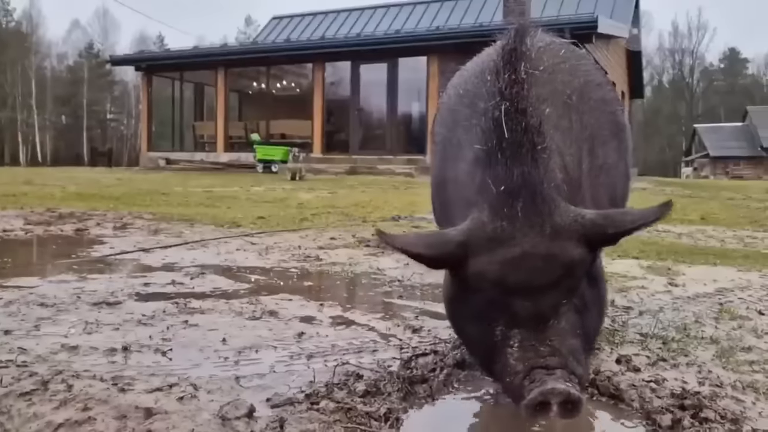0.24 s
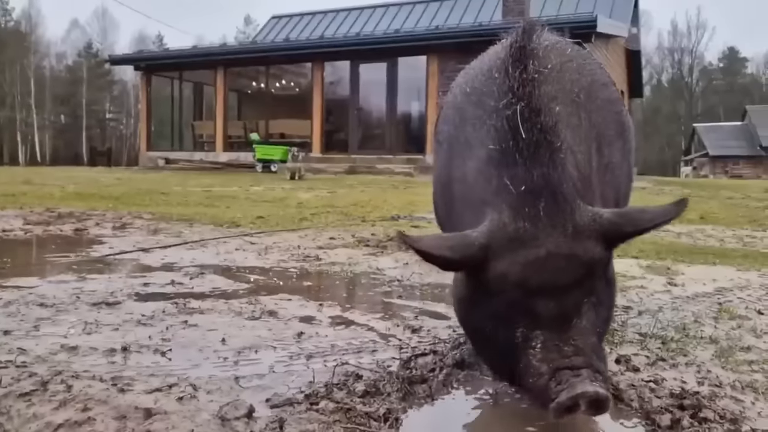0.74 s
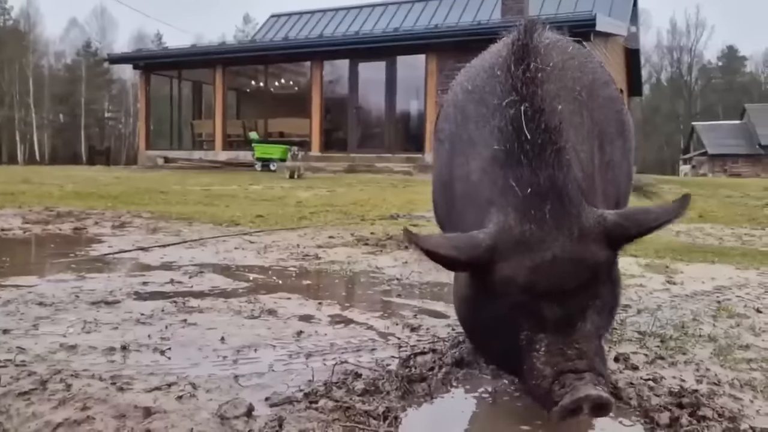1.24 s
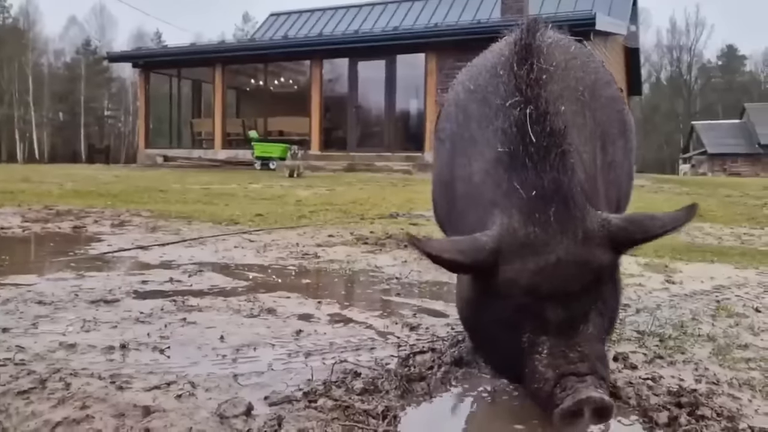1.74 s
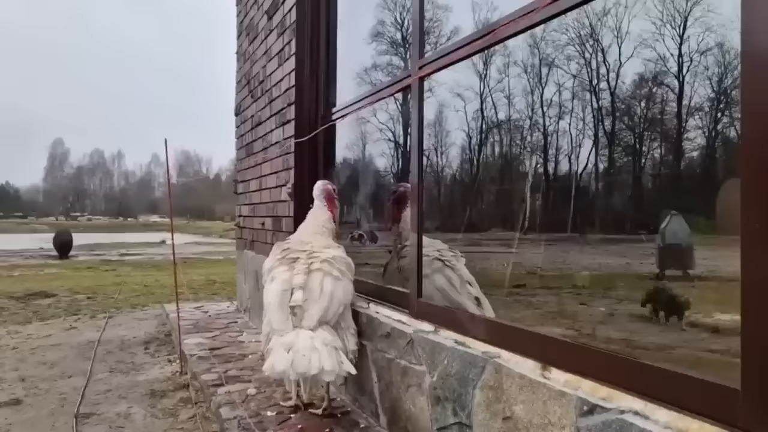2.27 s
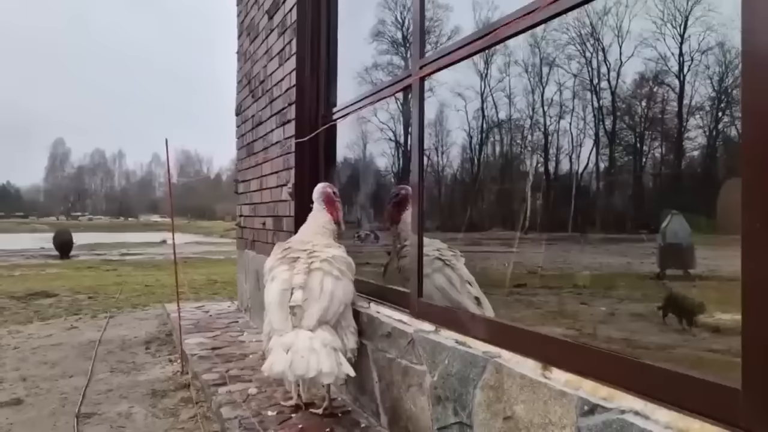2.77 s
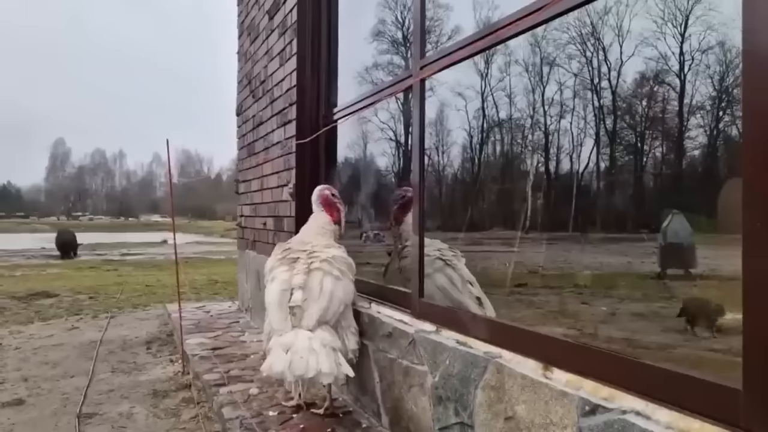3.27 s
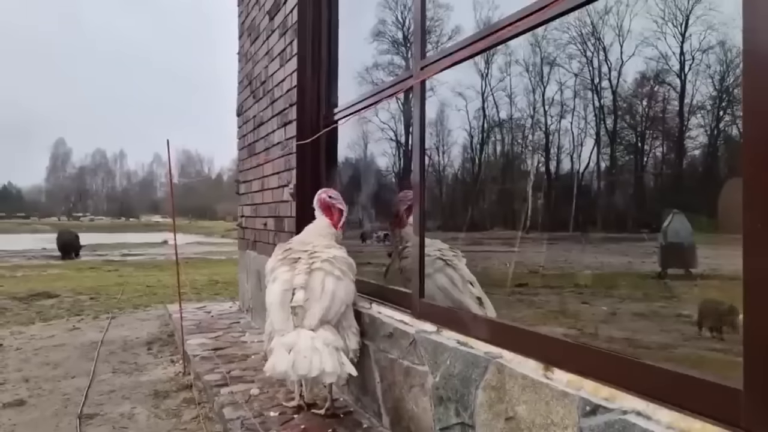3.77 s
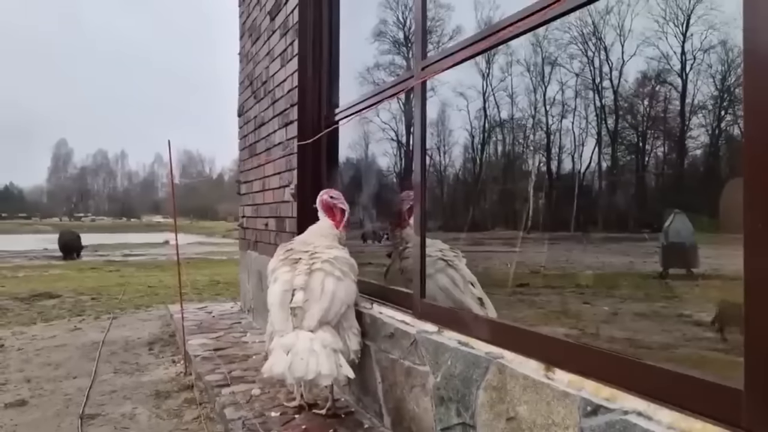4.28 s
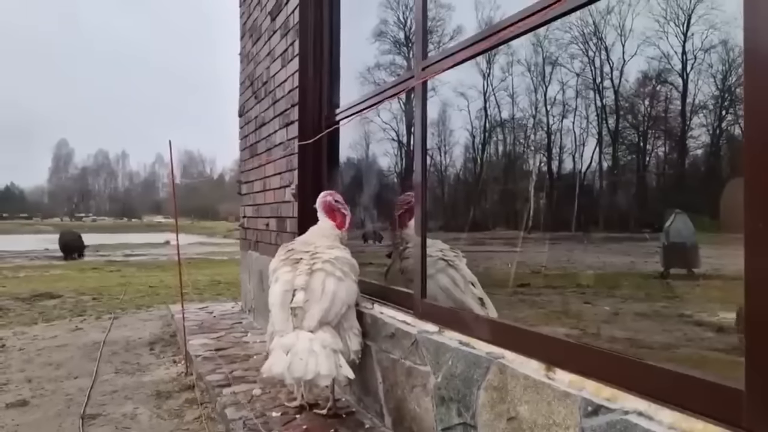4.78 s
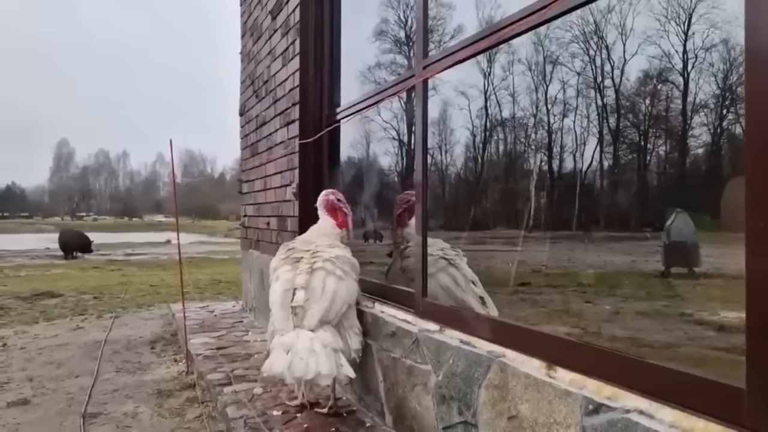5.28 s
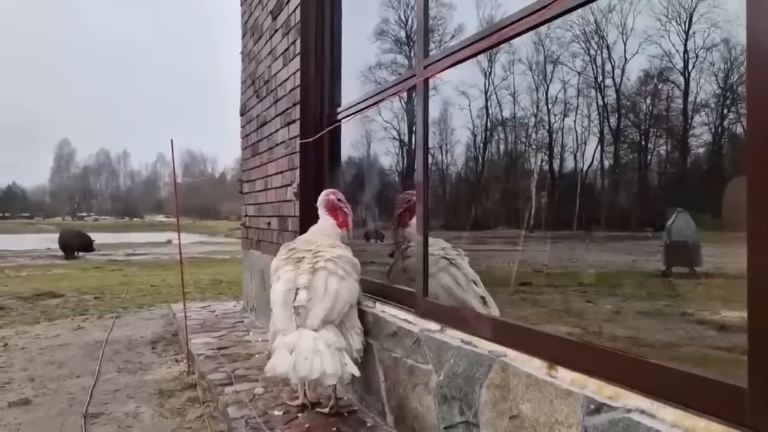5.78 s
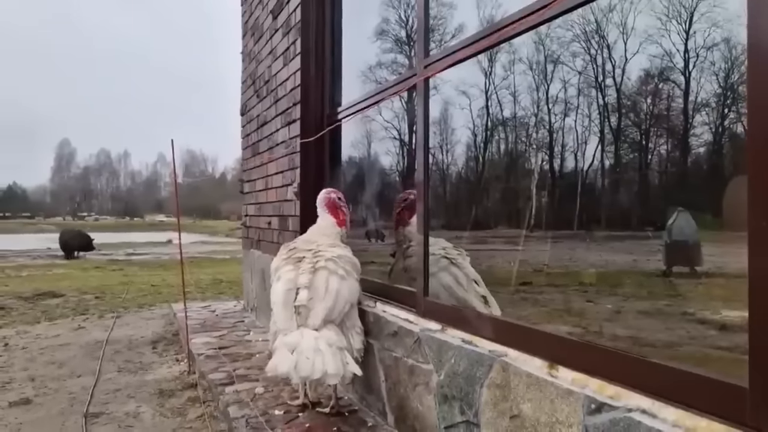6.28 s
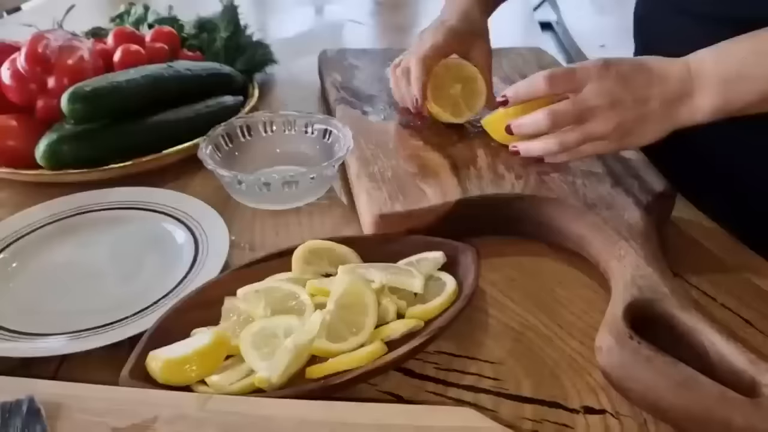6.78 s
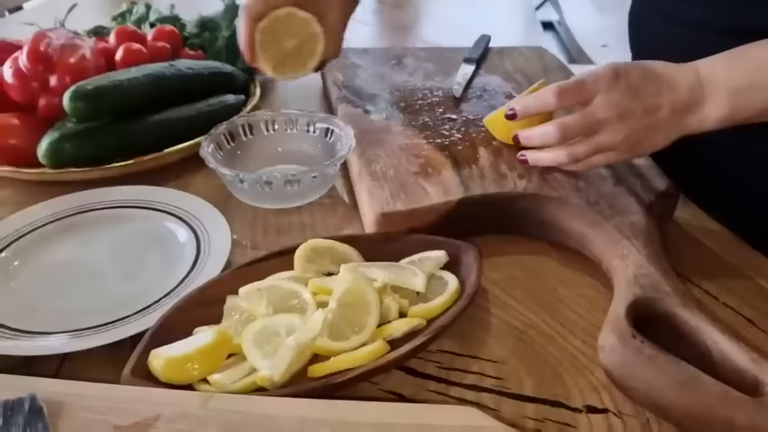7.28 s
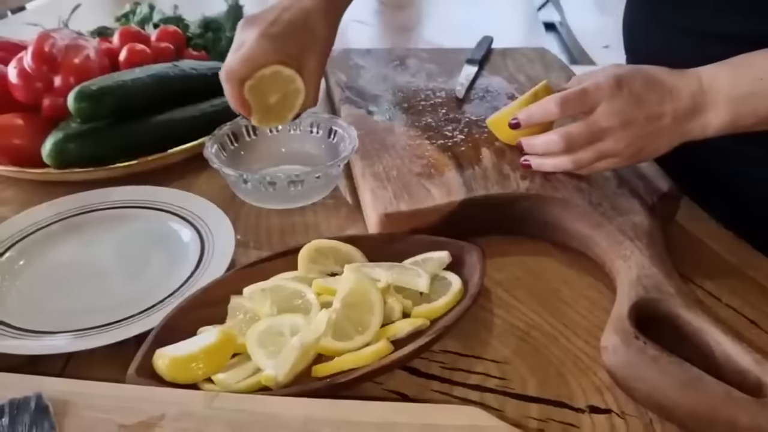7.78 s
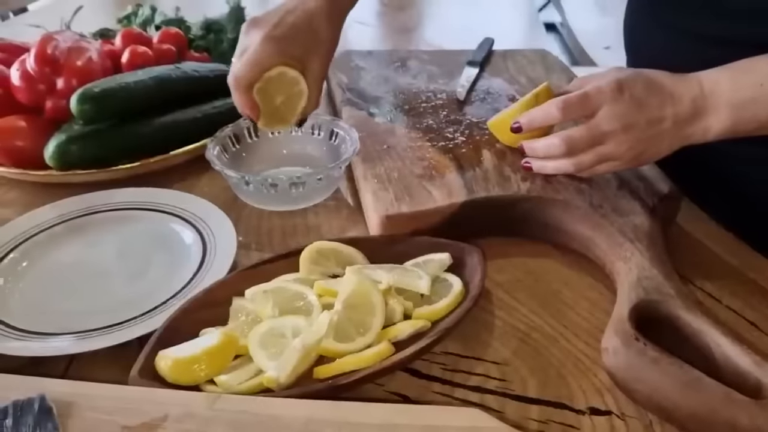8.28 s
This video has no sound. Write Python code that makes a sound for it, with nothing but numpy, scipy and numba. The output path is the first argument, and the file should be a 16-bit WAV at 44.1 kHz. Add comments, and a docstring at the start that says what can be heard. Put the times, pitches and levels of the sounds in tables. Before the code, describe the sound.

A pig roots and slurps wetly in mud, then a turkey peeps and yelps in a quiet yard, then a low kitchen hum.

```python
"""Pig, turkey and kitchen

Three moments joined by hard cuts. A pig roots, slurps and snorts in wet mud, made of bubble tones and noise.
A turkey by a window yelps with near-sine calls, peeps, clucks, ticks and drums softly in a quiet yard.
Air and low wind, both shaped noise, run under these two. Then a kitchen hums as noise in its room modes
while a clatter dies away, a hiss grows and squeezed fruit gives faint wet ticks."""
import sys
import numpy as np
from scipy import signal
from scipy.io import wavfile
from scipy.ndimage import uniform_filter1d
from numba import njit

SR = 44100
rng = np.random.default_rng(int(sys.argv[2]) if len(sys.argv) > 2 else 0)


def store_pcm(level_fs):
    """Save levels as 16-bit WAV."""
    pcm = np.round(np.clip(level_fs, -1, 1) * 32767).astype(np.int16)
    wavfile.write(sys.argv[1], SR, np.atleast_2d(pcm).T)


N = 376173  # length in samples
T = np.arange(N) / SR  # time of each sample in seconds
YARD_S, KITCHEN_S = 2.227, 6.8  # when the yard and the kitchen begin, in seconds


def undb(db):
    """Turn a level in dB into a multiplier."""
    return 10 ** (np.asarray(db) / 20)


def unit(x):
    """Scale a sound to an average (rms) level of 1."""
    return x / np.sqrt(np.mean(x ** 2))


@njit
def svf(x, hz, width):
    """Resonance that lets through sound around one pitch (a state-variable band-pass), gain 1 at its centre."""
    y, band_state, low_state = np.empty(len(x)), 0., 0.
    g, k = np.tan(np.pi * hz / SR), width / hz
    for i in range(len(x)):
        v = (band_state + g * (x[i] - low_state)) / (1 + g * (g + k))
        band_state = 2 * v - band_state
        low_state = low_state + 2 * g * v
        y[i] = k * v
    return y


def band(hz, width, size=N):
    """Noise through one resonance twice, at rms level 1."""
    noise = rng.standard_normal(size)
    once = svf(noise, 1. * hz, 1. * width)
    return unit(svf(once, 1. * hz, 1. * width))


def walk(rate):
    """Smooth random wandering, with about `rate` new levels a second and rms 1."""
    hold = int(SR / rate)
    steps = np.repeat(rng.standard_normal(N // hold + 1), hold)
    smooth = uniform_filter1d(uniform_filter1d(steps, hold), hold)
    return unit(smooth[:N])


def curves(table, off_db=-120):
    """Draw each column of a table as a curve over time, silent outside the times it lists."""
    s, *columns = np.transpose(table)
    return [np.interp(T, s, c, left=off_db, right=off_db) for c in columns]


def add(out, s, sound):
    """Mix a short sound in at time s."""
    i = max(int(s * SR), 0)
    out[i:i + len(sound)] += sound[:N - i]


def pops(table, rise_ms, glide, wet, spread):
    """Each pop is a bubble tone, gliding up if the bubble shrinks, mixed with noisy spatter around its pitch."""
    out, wet = np.zeros(N), np.clip(wet, 0, 1)
    for s, db, hz, ms, rise, wide in zip(*np.broadcast_arrays(*np.transpose(table), rise_ms, spread)):
        t = T[:int(7 * (ms + rise) * SR / 1000)]
        shape = (1 - np.exp(-1000 * t / rise)) ** 2 * np.exp(-1000 * t / ms)
        tone = np.sin(2 * np.pi * hz * t * (1 + glide * (1000 * t / ms).clip(0, 3)))
        spatter = band(hz, wide * hz, size=len(t)) / np.sqrt(2)
        mixture = np.sqrt(1 - wet) * tone + np.sqrt(wet) * spatter
        add(out, s - rise / 1000, undb(db) * shape / shape.max() * mixture)
    return out


def swell(out_size, hz, width, clear):
    """A rounded burst: a tone and breath in one resonance, more tone as clear nears 1."""
    tone = np.sin(2 * np.pi * hz * T[:out_size])
    breath = band(hz, width, size=out_size) / np.sqrt(2)
    return np.hanning(out_size) ** 0.35 * (clear * tone + (1 - clear) * breath)


def air():
    """Outdoor air and microphone hiss: many bands of noise, each flickering a little in level."""
    # Each row: pitch in Hz, relative level in dB per Hz.
    air_colour = [(15, -36), (25, -6), (55, 0), (82, 0), (160, -23.5), (227, -12.5), (378, -16), (762, -21),
                  (1240, -26.5), (4750, -28.5), (7100, -32.5), (14300, -34.5), (15500, -34.5)]
    hz, db = np.transpose(air_colour)
    out = 0
    for f in 200 * 2 ** np.arange(0, 6.4, 1 / 3):
        band_db = np.interp(np.log(f), np.log(hz), db) + 1.26 * walk(3.08)
        # a wider band holds more power, hence the square root
        out = out + undb(band_db) * np.sqrt(f) * band(f, f / 2.0)
    return undb(-52.5) * unit(out)


def wind():
    """Low buffeting on the microphone: deep noise bands that swell in short irregular lumps."""
    # How strong the low wind is. Each row: time in seconds, relative level in dB.
    wind_levels = [(0.0, -43.5), (1.81, -45), (3.59, -50.5), (5.73, -49), (6.18, -51), (6.79, -49.5)]
    lumps = band(58.2, 35) + undb(-3.5) * band(93, 60) + undb(-9) * band(169, 134)
    return undb(curves(wind_levels)[0] + 3.5 + 0.86 * walk(14)) * unit(lumps)


def bursts(low_hz, top_hz, wet):
    """Pops whose pitch lies in a range; higher ones rise faster and spatter over a relatively narrower band."""
    # Air pockets and water films bursting at the snout and lips.
    # Each row: time in seconds, peak level in dB, pitch in Hz, decay in milliseconds.
    burst_table = [(0.0288, -22.5, 540, 6.6), (0.0503, -14.5, 363, 3.5), (0.0547, -17.5, 2410, 5.0),
                   (0.0558, -18, 5040, 4.4), (0.071, -19.5, 550, 4.6), (0.0713, -13.5, 1740, 2.8),
                   (0.0888, -16.5, 566, 6.2), (0.096, -17, 1800, 4.6), (0.1426, -21, 3500, 3.6),
                   (0.1823, -18.5, 6800, 2.1), (0.1908, -2.5, 1130, 2.4), (0.1912, -17.5, 5000, 1.4),
                   (0.2083, -12.5, 1800, 2.3), (0.24, -34, 1920, 2.2), (0.262, -24, 2830, 1.5),
                   (0.3003, -24, 503, 3.2), (0.3085, -26.5, 494, 19), (0.31, -22, 4960, 3.2),
                   (0.3407, -13.5, 413, 3.4), (0.34, -23, 3770, 2), (0.373, -21.5, 487, 7.3),
                   (0.3752, -22.5, 3500, 1.7), (0.4259, -21.5, 576, 5.9), (0.4263, -26, 1800, 2.3),
                   (0.4262, -23, 7000, 2.6), (0.439, -21, 1720, 2.4), (0.4644, -16, 1225, 4.4),
                   (0.4665, -21, 1790, 11), (0.4772, -13, 3187, 1.6), (0.489, -20.5, 350, 3.2),
                   (0.4898, -18.5, 1810, 4.4), (0.503, -34.5, 8900, 1.3), (0.549, -15, 2060, 2.2),
                   (0.5496, -10, 4790, 2.9), (0.5534, -9, 925, 7.1), (0.5554, -18.5, 3210, 3.4),
                   (0.57, -23, 2100, 1.3), (0.6068, -22, 7800, 1.6), (0.6503, -15, 351, 10),
                   (0.6504, -21, 2660, 4.2), (0.6567, -19.5, 1980, 6.5), (0.6702, -14.5, 356, 3.7),
                   (0.6702, -21, 3206, 1.7), (0.7363, -24.5, 554, 3.9), (0.7485, -23.5, 490, 4.5),
                   (0.7993, -27, 1750, 2.2), (0.821, -37, 9000, 3), (0.84, -25, 3510, 1.7),
                   (0.8435, -25, 384, 4.6), (0.8523, -20, 6000, 2.3), (0.8644, -14.5, 2015, 5),
                   (0.8641, -3.5, 617, 2.53), (0.864, -13.5, 3439, 1.3), (0.8861, -20, 2240, 1.8),
                   (0.9143, -25, 6300, 1.6), (0.9419, -20, 2010, 1.6), (0.9882, -25.5, 3520, 1.6),
                   (1.107, -27.5, 710, 6.5), (1.137, -26, 510, 6.2), (1.169, -18.5, 810, 0.84),
                   (1.2583, -18.5, 4050, 1.8), (1.2743, -17, 3990, 3.4), (1.291, -13.5, 3970, 2.1),
                   (1.2951, -16.5, 1810, 15.6), (1.3048, -18, 3490, 1.2), (1.3078, -12.5, 988, 6.6),
                   (1.3086, -2.5, 1847, 1.5), (1.343, -17.5, 920, 3.6), (1.344, -22.5, 2040, 5.1),
                   (1.395, -31, 7000, 2.1), (1.42, -23, 3830, 1.5), (1.4525, -21.5, 980, 6),
                   (1.517, -31, 5000, 4), (1.552, -29, 2080, 6.4), (1.5757, -28.5, 326, 15),
                   (1.5756, -23.5, 1650, 5.1), (1.5742, -23, 3900, 1.7), (1.6158, -19, 320, 6.7),
                   (1.6173, -22.5, 3430, 2.3), (1.64, -41, 4800, 2), (1.706, -21, 720, 6.1),
                   (1.707, -21.5, 3700, 1.5), (1.76, -31.5, 5200, 2.1), (1.783, -22, 4230, 0.9),
                   (1.792, -23, 3680, 0.81), (1.8146, -14, 4750, 0.84), (1.8199, -15, 2700, 1),
                   (1.8202, -19, 3970, 2.3), (1.833, -11, 984, 7.3), (1.8318, -20, 3660, 3.8),
                   (1.8325, -4.5, 2010, 2.2), (1.8394, -24, 5210, 1.1), (1.8876, -28.5, 1220, 6.9),
                   (1.9132, -22.5, 1020, 16), (1.936, -10, 2290, 1.3), (1.9445, -26, 2140, 2.2),
                   (1.9697, -18.5, 910, 2.8), (1.9709, -24, 1980, 1.8), (2.01, -26.5, 5430, 2.1),
                   (2.0358, -28, 3600, 1.3), (2.131, -25, 3230, 1.7)]
    rows = np.array([row for row in burst_table if low_hz <= row[2] < top_hz])
    khz = rows[:, 2] / 1000
    return pops(rows, rise_ms=1.08 * khz ** -.4, glide=.012, wet=wet, spread=0.98 * khz ** -0.38)


def squelch():
    """Hundreds of tiny random bubbles a second, dull and bright, in a patchy fizz, following how hard the snout digs."""
    # How hard the snout digs.
    # Each row: time in seconds, dull bubble level in dB, bright bubbles compared with dull in dB.
    digging = [(0.0, -38, -6.5), (0.43, -41, -.6), (0.7, -45.5, -4.5), (0.88, -43.5, -5), (1.29, -43.5, -3),
               (1.5, -43.5, 0.2), (1.69, -45.5, 0.5), (1.87, -41.5, -4), (2.01, -39.5, -7),
               (2.07, -40.5, -1), (2.18, -41, -2.5), (2.23, -42.5, -5)]
    dull_db, tilt_db = curves(digging)
    bright_db = dull_db + tilt_db + 1.7 * walk(18)
    fizz_db = bright_db - 14 + 2.5 * walk(25)
    patches = undb(2.5 * walk(49.9) + 5.5 * walk(400))
    out = patches * (undb(fizz_db) * band(6700, 12000)
                     + undb(bright_db - 10.5) * band(4000, 4200)
                     + undb(dull_db - 11.5) * band(1100, 1450))
    for db, low_hz, top_hz, cycles in ((dull_db, 250, 2500, 4.5), (bright_db, 1800, 7000, 9)):
        s, pitch, size = rng.random((900, 3)).T
        hz = low_hz * (top_hz / low_hz) ** pitch
        grains = np.transpose([s * YARD_S, -3.0 * np.log(1 - size), hz, 1000 * cycles / hz])
        layer = pops(grains, rise_ms=1.2, glide=.02, wet=.6, spread=.3)
        out = out + undb(db) * layer / np.std(layer[T < YARD_S])
    return out


def pig():
    """Plops, smacks, cracks and slurps in a fine spray; squelch runs under them; a fluttering snort ends it."""
    # The closing snort. Each row: time in seconds, effort in dB.
    snort_effort = [(2.135, -52), (2.15, -32), (2.175, -26.5), (2.195, -20), (2.21, -22), (2.227, -43)]
    # The snout's resonances. Each row: pitch in Hz, width in Hz, relative level in dB.
    snout_modes = [(530, 200, 0), (1000, 300, -5), (2440, 220, -4), (3450, 260, -5), (4500, 350, -11),
                   (5100, 300, -14), (10500, 5000, -17)]
    # Slurps that swell and fade in one mouth resonance.
    # Each row: start in seconds, relative level in dB, pitch in Hz, width in Hz.
    slurp_table = [(0, -41, 2520, 300), (0.036, -26, 4660, 2500), (.08, -39, 590, 250),
                   (0.162, -33, 3480, 2500), (0.299, -30, 520, 150), (.41, -35, 1800, 1200),
                   (.462, -20, 1850, 300), (.679, -42, 4400, 2500), (.745, -32, 1970, 300),
                   (.775, -40, 1940, 300), (.838, -37, 2800, 2000), (.965, -37, 2290, 300),
                   (1.004, -36, 4100, 1970), (1.191, -32, 1070, 500), (1.349, -36, 1530, 900),
                   (1.57, -35, 400, 151), (1.919, -22, 1100, 504), (1.92, -30.5, 2480, 900),
                   (2.06, -35, 3970, 2500)]
    # The mouth colours the spray. Each row: pitch in Hz, width in Hz, relative level in dB.
    mouth_modes = [(1840, 250, -9), (2540, 280, -24), (3320, 300, -7)]
    # pops below the first pitch are pockets in the mud; above the second, wetter thin films
    pocket_hz, film_hz = 1400, 3205
    effort_db = curves(snort_effort)[0]
    snort = 0
    for hz, width, db in snout_modes:
        # harder blowing opens the upper resonances
        opening_db = 0.095 * np.log2(hz / 500) * (effort_db + 20)
        snort = snort + undb(db + 1.4 * walk(120) + opening_db) * band(hz, width)
    cracks = bursts(film_hz, SR, wet=0.78)
    lips = bursts(pocket_hz, film_hz, wet=0.57) + cracks
    plops = bursts(0, pocket_hz, wet=0.47)
    slurps = np.zeros(N)
    for s, db, hz, width in slurp_table:
        add(slurps, s, undb(db) * swell(int(0.0377 * SR), hz, width, clear=0))
    # air sucked through water sputters in quick uneven pulses
    lips = lips + slurps * undb(4 * walk(300) - 2)
    # water is squeezed out before each pop and patters after it
    linger = np.exp(-1 / (0.0048 * SR))
    splash = signal.filtfilt([1 - linger], [1, -linger], np.abs(lips) + undb(-0.5) * np.abs(plops))
    spray_noise = band(3200, 5190) + sum(undb(db) * band(hz, w) for hz, w, db in mouth_modes)
    spray = undb(-14 + 2.0 * walk(250)) * spray_noise
    # the cracking films add a brief mist of very high treble
    mist_level = uniform_filter1d(np.abs(cracks) ** 1.33, size=90)
    mist = mist_level * undb(-12 + 6.9 * walk(80.05)) * band(11500, 10000)
    return lips + plops + splash * spray + mist + squelch() + undb(effort_db - 7.5) * snort


def rustles():
    """Faint rustles and scratches around the yard: small noisy pops at random times and pitches."""
    s, pitch, size, length = rng.random((90, 4)).T
    start_s = YARD_S + s * (KITCHEN_S - YARD_S)
    peak_db = -53.5 - 2.2 * np.log(1 - .95 * size)
    grains = np.transpose([start_s, peak_db, 500 * 10 ** pitch, 2 + 10 * length])
    return pops(grains, rise_ms=2.0, glide=0, wet=.9, spread=.3)


def yelps():
    """Near-sine calls with weak overtones; a flutter near 60 a second shakes pitch and level in the rough parts."""
    # The turkey's calls, one list for each.
    # Each row: time in seconds, pitch in Hz, level in dB before flutter, flutter from 0 to 1.
    call_table = [
        [(2.664, 1090, -39, 0.03), (2.672, 977, -25.5, 0.06), (2.688, 945, -29, 0.26),
         (2.695, 880, -25.5, 0.44), (2.701, 816, -36, 0.28), (2.71, 762, -30, 0.47), (2.717, 740, -57, .3)],
        [(3.797, 600, -51, 0), (3.802, 755, -27, 0.1), (3.809, 1050, -24.5, 0), (3.813, 1080, -39, 0)],
        [(3.865, 2007, -60, 0.45), (3.92, 1460, -46, 0.45), (3.945, 1330, -41, 0.7), (3.965, 1354, -44, .8),
         (3.99, 1238, -37, 0.8), (4.016, 1097, -25.5, 0), (4.035, 1054, -15.5, 0), (4.05, 986, -15.5, 0),
         (4.058, 830, -24.5, 0.03), (4.064, 687, -29.5, 0.3), (4.072, 870, -48, 0.5), (4.09, 904, -52, .45)],
        [(3.92, 1830, -51, 0.4), (3.99, 1757, -46, 1), (4.02, 1550, -47, 0.6)],
    ]
    # How overtones pass the throat.
    # Each row: pitch in Hz, second-harmonic level in dB when the call is at -29 dB.
    throat_colour = [(1200, -59), (1800, -44), (2300, -74), (2650, -61), (3000, -46.5), (3500, -49),
                     (3900, -58), (4500, -50), (5300, -58)]
    out = 0
    beat = np.sin(2 * np.pi * np.cumsum(60 * (1 + 0.142 * walk(30))) / SR)
    for call in call_table:
        hz, db, flutter = curves(call)
        flutter, sounding = flutter.clip(0, 1), hz > 0
        phase = 2 * np.pi * np.cumsum(hz * (1 + 0.0094 * walk(120) + 0.077 * flutter * beat)) / SR
        tone = undb(db) * np.sin(phase)
        for k in range(2, 5):
            # overtones grow more slowly than the call; a drop per harmonic adds to the throat's colouring
            throat_db = np.interp(k * hz, *np.transpose(throat_colour)) + 0.45 * (db + 29) - 3.5 * (k - 2)
            tone = tone + sounding * undb(throat_db) * np.sin(k * phase)
        # breath roughens the fluttering parts into a noisy skirt around each partial
        rasp = 1 + .45 * flutter * walk(500)
        out = out + np.sqrt(2) * tone * rasp * (1 - 0.53 * flutter * beat)
    return out


def turkey():
    """Yelps, peeps, clucks and ticks with an echo off the wall, and low drumming in the chest."""
    # Soft peeps. Each row: start in seconds, relative level in dB, pitch in Hz, length in seconds.
    peep_table = [(2.336, -42, 1486, 0.035), (2.797, -38.5, 1485, 0.022), (3.403, -43, 2030, 0.029),
                  (3.695, -46, 2230, .017), (4.259, -43, 1130, 0.032), (4.36, -50, 1910, 0.022),
                  (4.808, -40, 1720, 0.028), (4.85, -46, 1500, 0.026), (4.927, -38, 1765, 0.019),
                  (4.948, -44, 1650, .03), (5.697, -51.5, 3700, 0.11), (5.738, -40.5, 2430, 0.024),
                  (6.681, -33.5, 1095, 0.033)]
    # Beak and claw ticks. Each row: time in seconds, peak level in dB, pitch in Hz, treble peak level in dB.
    tick_table = [(2.552, -26, 1270, -54), (2.786, -49, 1490, -41.5), (3.045, -35.5, 1510, -45),
                  (3.176, -41, 2150, -46), (3.303, -34.5, 1130, -65), (3.544, -41, 1400, -42.5),
                  (3.768, -35.5, 1380, -51), (3.858, -29, 1230, -57), (3.943, -31.5, 1240, -42),
                  (4.463, -37.5, 1950, -43), (4.806, -39.5, 1720, -31), (4.901, -36, 1170, -62),
                  (5.446, -41, 1790, -50.5), (5.767, -34.5, 2060, -49), (5.838, -36, 920, -40.5),
                  (5.915, -34.5, 1000, -46), (6.66, -40, 1260, -55), (6.679, -35.5, 1105, -52)]
    # Short clucks.
    # Each row: time in seconds, peak level in dB, pitch in Hz, decay in milliseconds, breath peak level in dB.
    cluck_table = [(2.37, -42, 905, 4, -54), (2.737, -43, 816, 5, -46.5), (4.098, -44.5, 1570, 18, -39.5),
                   (4.138, -30.5, 450, 5.4, -44.5), (4.139, -36, 1080, 6.6, -56),
                   (4.395, -35, 794, 3.6, -45), (4.66, -45, 800, 4, -54), (4.728, -44.5, 753, 17, -60),
                   (5.064, -38, 395, 4.1, -55), (5.409, -36, 434, 8, -55), (5.899, -28.5, 1013, 4.2, -38.5),
                   (6.133, -43.5, 577, 4.6, -54)]
    # Drumming in the chest, a long low and a short upper resonance.
    # Each row: start in seconds, low level in dB, low pitch in Hz, upper level in dB.
    drum_table = [(2.507, -23, 79, -28.5), (2.559, -25, 76, -23), (4.04, -34.5, 49.6, -45.5),
                  (5, -25.5, 75, -27.5)]
    voice, drums = yelps(), np.zeros(N)
    for s, db, hz, length in peep_table:
        add(voice, s, undb(db) * swell(int(length * SR), hz, 310, clear=0.62))
    s, db, hz, treble_db = np.transpose(tick_table)
    tick_body = np.transpose([s, db, hz, 1.6 + 0 * s])
    tick_treble = np.transpose([s, treble_db, 4500 + 0 * s, 4.4 + 0 * s])
    voice += pops(tick_body, rise_ms=.3, glide=0, wet=.6, spread=1.2)
    voice += pops(tick_treble, rise_ms=0.44, glide=0, wet=0.95, spread=0.84)
    s, db, hz, ms, breath_db = np.transpose(cluck_table)
    cluck_body = np.transpose([s, db, hz, ms])
    cluck_breath = np.transpose([s, breath_db, 3800 + 0 * s, ms])
    voice += pops(cluck_body, rise_ms=2.39, glide=0.0087, wet=0.55, spread=0.72)
    voice += pops(cluck_breath, rise_ms=3.4, glide=0, wet=1, spread=0.74)
    for s, low_db, low_hz, upper_db in drum_table:
        t = T[:int(0.048 * SR)]
        upper = undb(upper_db) * np.exp(-(t / 0.0174) ** 2) * np.sin(2 * np.pi * 163 * t)
        low = undb(low_db) * np.hanning(len(t)) ** 0.33 * np.sin(2 * np.pi * low_hz * t)
        add(drums, s, -upper - low)
    # the echo starts after 6 ms and would fall 60 dB in 0.13 s
    tail = rng.standard_normal(6000) * undb(-60 * T[:6000] / 0.13) * (T[:6000] > .006)
    echo = undb(-36.5) * signal.fftconvolve(voice, tail)[:N]
    return voice + drums + echo


def kitchen():
    """Appliance rumble in the room modes, growing hiss, the fading ring of a clatter and wet ticks, from noise and pops."""
    # The kitchen's room modes. Each row: pitch in Hz, width in Hz, relative level in dB.
    room_modes = [(40, 7, -4.5), (71.6, 8.9, -1), (89, 22.5, -0.5), (120.5, 8.9, -13.5), (158.7, 34, -6),
                  (233, 57, -8.5), (280, 35, -11.5), (348, 67, -16.5), (477, 630, -14.5)]
    # Level of the hum. Each row: time in seconds, level in dB.
    hum_levels = [(6.8, -31), (7.2, -30), (7.3, -33.5), (7.85, -30.5), (8.1, -30.5), (8.18, -28),
                  (8.53, -27.5)]
    # A clatter still ringing in the room.
    # Each row: pitch in Hz, width in Hz, level in dB as the kitchen begins, seconds to fall by 60 dB.
    clatter_modes = [(290, 20, -36, 0.82), (710, 650, -37.5, 1.3), (1290, 480, -40.5, 0.79),
                     (1850, 810, -41, 0.95), (1860, 52, -45, 0.95), (2900, 1900, -49.5, 1.2)]
    # Swells of the hiss. Each row: peak time in seconds, rise in dB, seconds from the peak to 37% of that rise.
    swish_table = [(7.39, 3, 0.033), (8.29, 6.5, 0.13)]
    # Faint wet ticks as the fruit is squeezed.
    # Each row: time in seconds, peak level in dB, pitch in Hz, decay in milliseconds.
    squirt_table = [(7.7, -46, 3500, 5), (8.052, -42, 5030, 1.5), (8.18, -43, 7000, 1.5),
                    (8.288, -45, 7860, 5), (8.455, -47, 7100, 5)]
    hum_db = curves(hum_levels)[0]
    hum = unit(sum(undb(db + 1.2 * walk(5)) * band(hz, w) for hz, w, db in room_modes))
    hiss = band(4630, 4400) * undb(0.73 * walk(12))
    top_hiss = band(10000, 9800) + undb(-2.0) * band(13800, 7000)
    after = np.maximum(T - KITCHEN_S, 0)
    swish_db = sum(db * np.exp(-((T - s) / half) ** 2) for s, db, half in swish_table)
    # both hisses grow, in dB a second, as the squeezing goes on
    hiss_db = -57 + 3 * after + swish_db
    top_db = -68 + 3.5 * after + 0.25 * swish_db
    ring = sum(undb(db - 60 * after / t60) * band(hz, w) for hz, w, db, t60 in clatter_modes)
    squirts = pops(squirt_table, rise_ms=1.3, glide=0, wet=.7, spread=.3)
    mid = undb(-55.0) * band(1640, 3400)
    return undb(hum_db) * hum + undb(hiss_db) * hiss + undb(top_db) * top_hiss + ring + mid + squirts


def scene():
    """Mud, yard and kitchen in turn."""
    outdoors = air() + wind() + pig() * (T < YARD_S) + turkey() + rustles()
    return np.where(T < KITCHEN_S, outdoors, kitchen())[None]


def record(dry):
    """Peaks are rounded to stay below full scale, then a steep filter cuts the treble above 15350 Hz."""
    rounded = dry / (1 + dry ** 6) ** (1 / 6)
    return signal.sosfilt(signal.ellip(10, .2, 60, 15350, fs=SR, output="sos"), rounded)


dry = scene()
out = record(dry)
store_pcm(out)
```